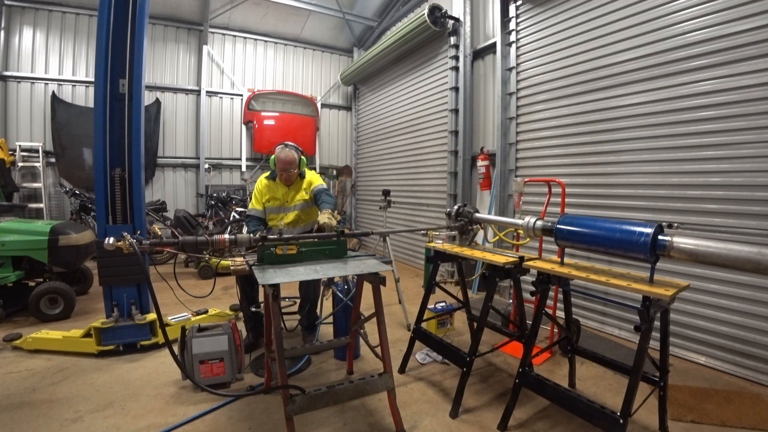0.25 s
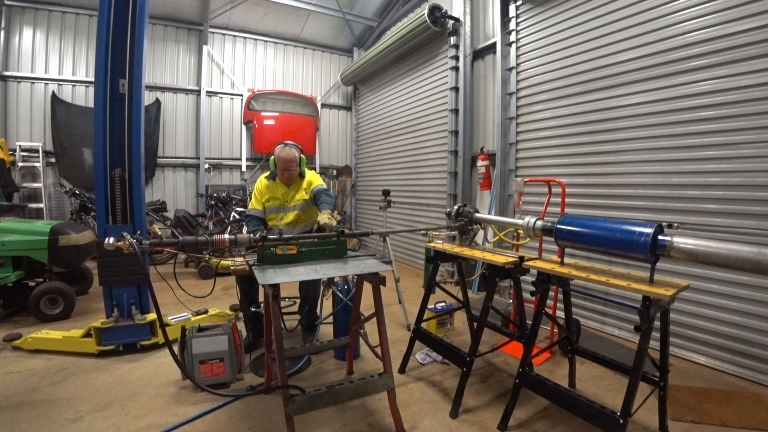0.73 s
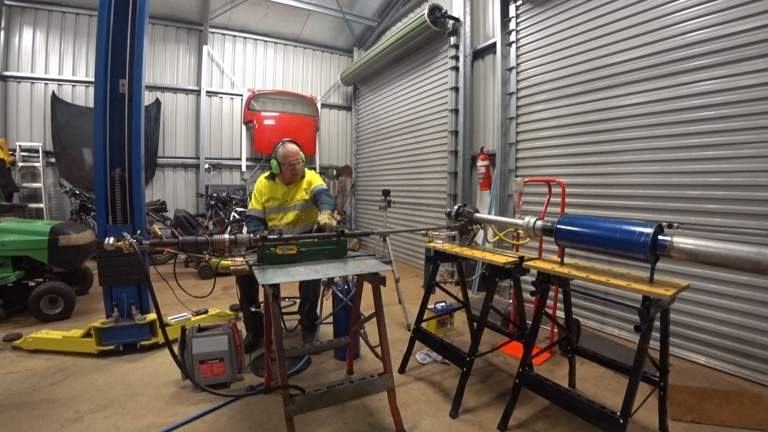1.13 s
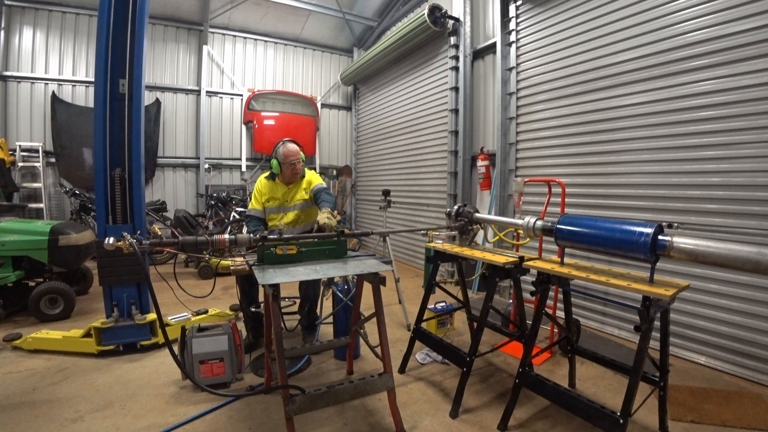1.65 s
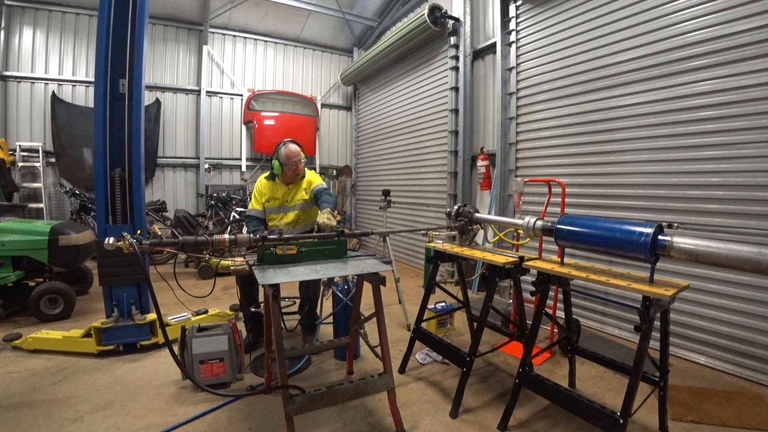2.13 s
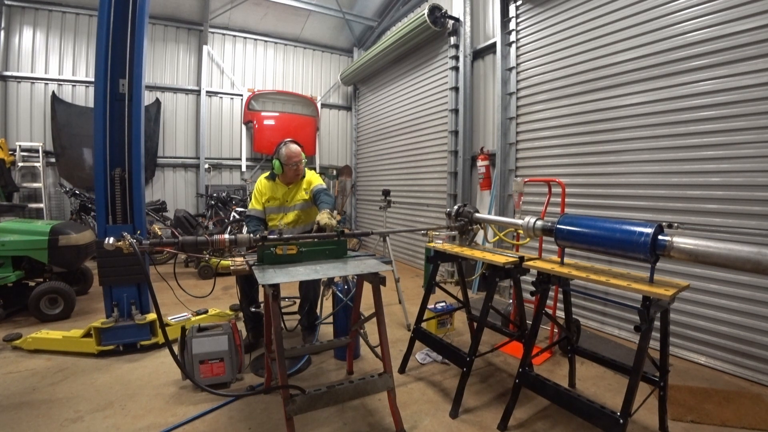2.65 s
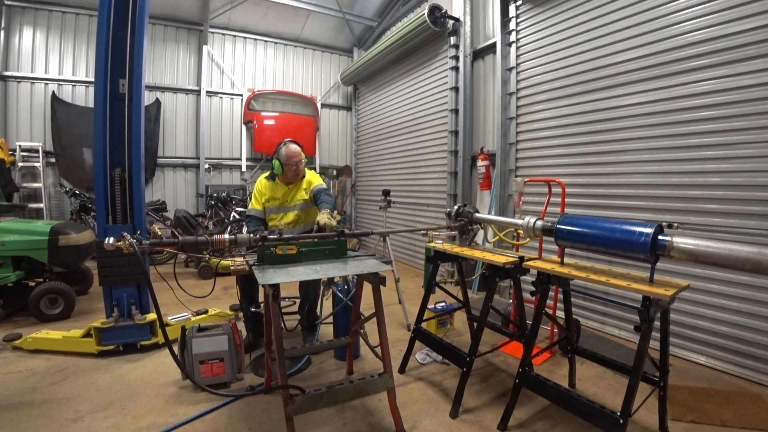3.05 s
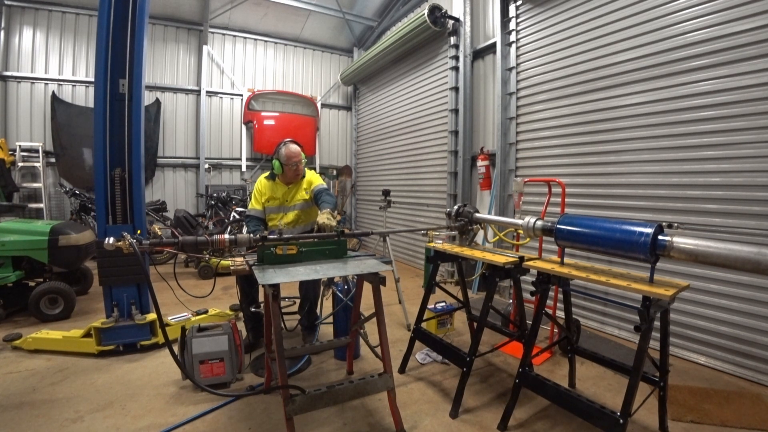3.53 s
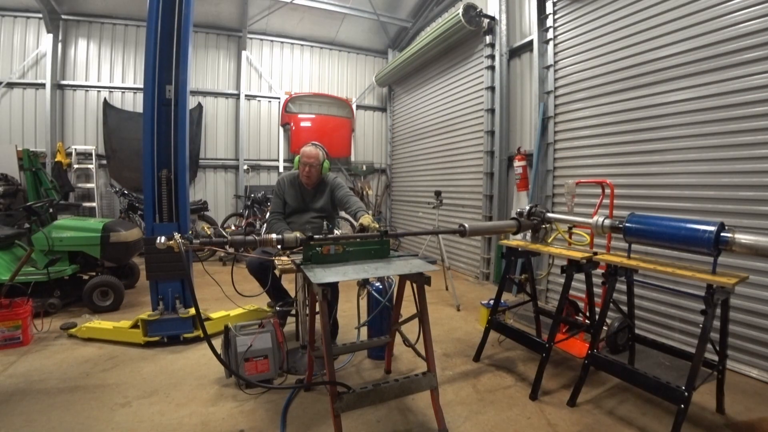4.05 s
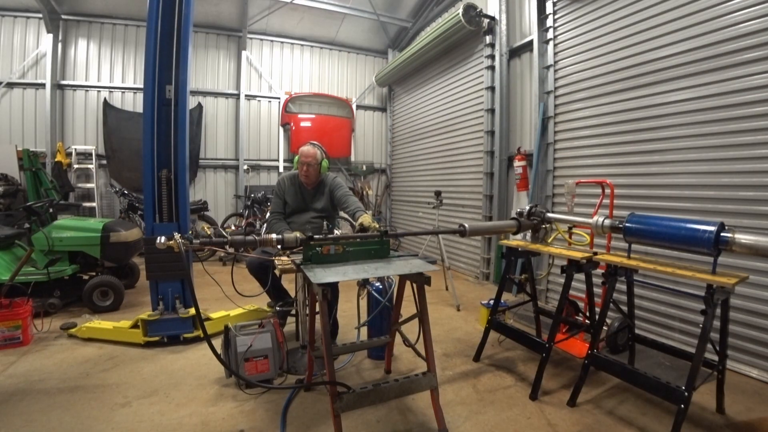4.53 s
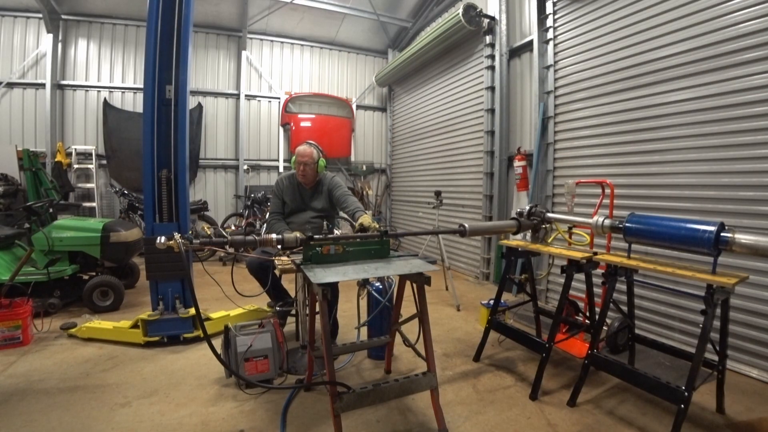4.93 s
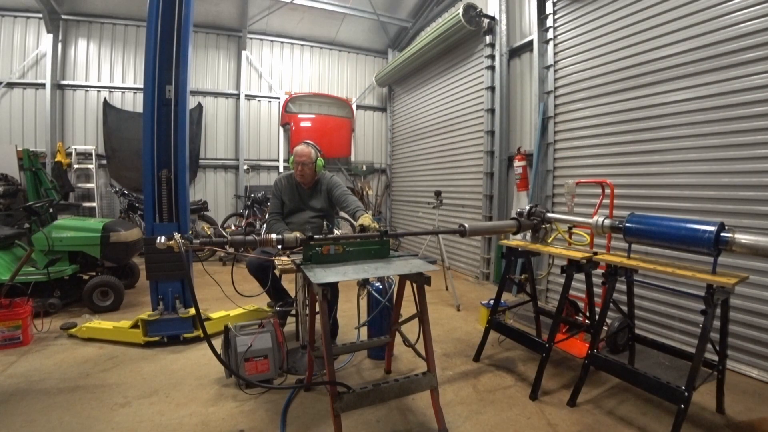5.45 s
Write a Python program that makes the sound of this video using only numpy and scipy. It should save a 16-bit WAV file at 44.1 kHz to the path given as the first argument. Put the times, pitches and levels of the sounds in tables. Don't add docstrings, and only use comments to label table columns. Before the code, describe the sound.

From 0 seconds a homemade detonation tube is firing inside a sheet-metal shed, about twenty pulses a second. The beat is regular underneath but ragged: some sparks give hard, bright cracks, others soft burns or barely a pop, and leftover gas adds late bangs between them. Each shot has a short noisy snap, a hollow midrange tube knock with quick echoes, and a dense clangy ring from the walls; the rings overlap into a harsh metallic roar. Around 0.35 to 0.4 seconds the ring briefly brightens. From about 3.1 seconds deep boom thins and the upper boom grows, sounding more nasal. At about 3.6 seconds firing and reverberation cut off instantly. Only a faint, steady compressed-gas hiss remains until about 5.5 seconds, coloured by thin whistling pipe resonances. The stereo pickup is loud and limited, light in deep bass, with thumps slightly to the right.

```python
import sys
import numpy as np
from scipy import signal
from scipy.fft import rfft, irfft, next_fast_len
from scipy.io import wavfile
from scipy.ndimage import uniform_filter1d

SR = 44100
rng = np.random.default_rng(int(sys.argv[2]) if len(sys.argv) > 2 else 0)


def attenuation_scalar(level_db):
    decades = np.asarray(level_db, float) / 20
    return 10 ** decades


def wav_record(signal):
    frames = np.transpose(np.atleast_2d(signal))
    bounded = np.clip(frames, -1, 1)
    quanta = np.round(bounded * 32767).astype(np.int16)
    wavfile.write(sys.argv[1], SR, quanta)


N = 251370


def shots():
    # (time [s], crack [dB], tube thump [dB], shed boom [dB])
    detonations = [(.0438, -17.5, -39, -17.5), (0.3421, -28, -25, -22), (0.4439, -23, -3.5, -22.5),
                   (0.6436, -15, -18, -18), (.7996, -22, -25, -23), (.9946, -20, -26, -18),
                   (1.1956, -16.5, -23, -17), (1.3949, -19, -19, -18.5), (1.4947, -18, -14, -17),
                   (1.6439, -17, -18, -16), (1.7963, -17.5, -16, -20.5), (1.8934, -19.5, -28, -28),
                   (1.947, -16, -12, -18.5), (2.0476, -21, -9.5, -16.5), (2.247, -14, -34, -17.5),
                   (2.5474, -20, -41, -18.5), (2.697, -21.5, -15, -21.5), (2.7476, -18.5, -32, -20.5),
                   (2.898, -18, -12, -18), (2.947, -20, -23, -26), (2.9968, -17.5, -26, -20.5),
                   (3.0968, -21, -29, -20), (3.197, -16, -4, -17), (3.2986, -22, -10, -17),
                   (3.3985, -20, -22, -18.5), (3.499, -20, -13, -21), (3.548, -16.5, -29, -21.5)]
    # (time [s], crack [dB], tube thump [dB], shed boom [dB])
    burns = [(0.0, -43, -18, -21.5), (.095, -36, -35, -18), (.1446, -25, -35, -25), (.1944, -25, -32, -24),
             (.2426, -33, -28, -31), (0.3959, -37, -15, -19), (.4954, -34, -13, -18.5),
             (0.5466, -24, -11, -23), (.5956, -25.5, -13.5, -28), (.7467, -23.5, -26, -25),
             (.8972, -25, -22, -26), (.944, -30, -19, -31), (1.046, -43, -30, -26.5),
             (1.097, -31, -16, -25), (1.2463, -43, -43, -19.5), (1.2953, -26, -16, -26),
             (1.4447, -45, -20, -22.5), (1.5465, -43, -38, -18.5), (1.6959, -31, -33, -19.5),
             (1.7478, -28, -16, -34), (1.8468, -46, -14, -24.5), (1.996, -39, -30, -26),
             (2.097, -38, -35, -19), (2.198, -29, -20, -26), (2.2964, -47, -19, -20.5),
             (2.3471, -42, -19, -21), (2.5975, -39, -43, -23.5), (2.7977, -41, -14, -20.5),
             (3.1503, -39, -35, -20), (3.3487, -43, -7.5, -24)]
    # (time [s], crack [dB], tube thump [dB], shed boom [dB])
    late_bangs = [(.16, -41, -7.5, -38), (.2105, -34, -6, -22), (.2736, -18.5, -21, -25),
                  (.7035, -38, -14, -21.5), (.8129, -47, -36, -29), (1.0628, -22, -16, -23),
                  (1.111, -40, -12, -24), (1.2612, -22, -14, -24), (1.56, -24, -4, -24),
                  (1.717, -23, -13, -32), (1.867, -20, -26, -24), (2.1135, -24, -11, -24.5),
                  (2.3141, -23, -20, -33), (2.363, -24, -18, -30), (2.417, -21.5, -14, -23.5),
                  (2.4633, -27, -10.5, -20), (2.6159, -23, -9, -27), (2.816, -22, -13, -27),
                  (3.0254, -27, -17, -23), (3.135, -25, -29, -21.5), (3.2274, -25, -20, -28),
                  (3.4374, -28, -16, -22), (3.5822, -20, -10, -30)]
    # (time [s], level [dB])
    richness = [(0, 0.), (.12, -1.), (.3, -3), (.34, 11), (.41, 11), (.47, 2.5), (.55, -5), (.8, 0),
                (1., 0), (1.65, -0.5), (1.95, 2), (2.2, -4.5), (2.45, -2), (2.75, 2.), (3., 0), (3.13, 6),
                (3.3, 3.), (3.55, 4.5)]
    spark_period_s, spark_count = 0.05006, 72
    sizzle_follows = 0.56
    misfire_db = (-34.5, -29.5, -33.5)

    sparks = 0.0446 + spark_period_s * np.arange(spark_count)
    lit = np.array(detonations + burns)[:, 0]
    misfires = [(s, *misfire_db) for s in sparks if abs(lit - s).min() > spark_period_s / 4]
    kinds = [(detonations, -7.5, -4), (burns, -9, -7.5), (late_bangs, -13, -8), (misfires, -10, -5)]
    rows = []
    for table, clang_db, sizzle_db in kinds:
        for row in table:
            rows.append((*row, row[3] + clang_db, row[3] + sizzle_db))
    rows = np.array(rows)
    rich_db = np.interp(rows[:, 0], *np.transpose(richness))
    return rows + np.outer(rich_db, [0, 0, 0, 0, 1, sizzle_follows])


def clicks(db, lag_s=0, sign=1):
    out = np.zeros(N)
    places = np.round((shots()[:, 0] + lag_s) * SR).astype(int)
    np.add.at(out, places, attenuation_scalar(db) * sign)
    return out


def rms_one(x):
    return x / np.sqrt(np.mean(x ** 2) + 1e-20)


def cracks(side_db=-23.0):
    # (centre [Hz], width [Hz], level [dB], time to fade 60 dB [s], delay [s])
    crack_bands = [
        (3040, 5800, -2.5, 0.015, 0.00075),
        (6100, 1850, -6, 0.028, 0.00016),
        (11620, 2300, -2.5, 0.071, 0.0011),
        (14150, 2500, 2.5, 0.014, 0.00077),
    ]
    out = 0
    for hz, width, db, t60, lag_s in crack_bands:
        band = signal.butter(2, [hz - width / 2, hz + width / 2], "band", fs=SR, output="sos")
        mid, side = rms_one(signal.sosfilt(band, rng.standard_normal((2, N))))
        struck = clicks(shots()[:, 1] + db, lag_s) ** 2
        energy = signal.lfilter([1], [1, -attenuation_scalar(-120 / (t60 * SR))], struck + 1e-18)
        out = out + np.sqrt(energy) * (mid + attenuation_scalar(side_db) * side * [[1], [-1]])
    return out


def thumps(scatter_db=2.5, burn_echo_db=-16.0):
    # (pitch [Hz], level under a shock [dB], level under a burn [dB], time to fade 60 dB [s])
    tube_tones = [(185, -39, -41, 0.082), (339, -13, -17.5, 0.063), (448, -16, -13, 0.081),
                  (540, -26, -22, 0.028), (668, -1.5, -8, 0.049), (794, -6, -19.5, 0.063),
                  (1148, -15, -13, 0.029), (2035, -29, -48, 0.018)]
    # (delay [s], level [dB])
    thump_echoes = [
        (.0013, -11),
        (.0205, -5),
        (.037, -5.5),
        (.046, -6),
    ]
    out = np.zeros(N)
    scatter = scatter_db * rng.standard_normal((len(shots()), len(tube_tones)))
    shock, burn = shots()[:, 1:3].T
    for (hz, shock_db, burn_db, t60), own in zip(tube_tones, scatter.T):
        struck = clicks(burn + burn_db + own, 0.00217)
        struck += clicks(burn + burn_db + burn_echo_db, 0.019)
        for lag_s, echo_db in thump_echoes:
            struck += clicks(shock + shock_db + echo_db + own, lag_s)
        r, w = attenuation_scalar(-60 / (t60 * SR)), 2 * np.pi * hz / SR
        out += signal.lfilter([0, np.sin(w)], [1, -2 * r * np.cos(w), r * r], struck + 1e-18)
    return out * attenuation_scalar(np.array([[-1.5], [1.5]]))


def at_hz(points, hz):
    table_hz, values = np.array(points).T
    return np.interp(np.log(hz + 1), np.log(table_hz), values)


def stereo_noise(size, spectrum, peaks, alike, lean, ripple_db, ripple_hz):
    hz = np.arange(size // 2 + 1) * SR / size
    lift_db = sum(db / (1 + (2 * (hz - centre) / width) ** 2) for centre, width, db in peaks)
    jagged = np.interp(hz / ripple_hz, np.arange(3000), rng.standard_normal(3000))
    lift_db += ripple_db * hz / (hz + 1500) * jagged
    mid, side = rfft(rng.standard_normal((2, size)))
    likeness = np.clip(at_hz(alike, hz), 0, 1)
    sides = np.array([[1], [-1]])
    pair = np.sqrt(1 + likeness) * mid + sides * np.sqrt(1 - likeness) * side
    return hz, pair * attenuation_scalar(at_hz(spectrum, hz) + lift_db + sides * at_hz(lean, hz) / 2)


def shed_answer(size, build_up_s, modes_db):
    # (frequency [Hz], level [dB per Hz])
    ring_colour = [(29, -62), (50, -12), (211, -14.5), (302, 4.5), (620, -2), (788, 6), (888, -14.5),
                   (1180, -11), (1820, -23.5), (2880, -13), (4530, -16.5), (6650, -11.5), (8870, -13),
                   (11500, -9.5), (15400, -17)]
    # (centre [Hz], width [Hz], lift [dB])
    panel_peaks = [(2640, 710, 8), (3273, 47, 6.5), (5660, 360, 4), (6590, 470, 3.5), (9970, 210, 6),
                   (11400, 1700, 2)]
    # (frequency [Hz], time to fade 60 dB [s])
    ring_fade = [(100, 0.42), (500, 0.43), (1500, 0.77), (4000, 1), (8000, 0.36), (14000, 0.39)]
    # (frequency [Hz], likeness [0 to 1])
    ring_alike = [(60, 0.9), (180, 1), (550, 0.96), (1650, 0.54), (4970, 0.75), (15000, 0.28)]
    # (frequency [Hz], left over right [dB])
    ring_lean = [(60, 3), (150, -3), (380, -4), (950, -3.0), (2380, 1), (5980, 2), (15000, -0.5)]
    # (pitch [Hz], level [dB], time to fade 60 dB [s])
    shed_modes = [(53.4, -4.5, 0.33), (116.4, -15.5, 0.55), (146, -33, 0.36), (176, -16, 0.35),
                  (271.5, -15, 1), (292, -7, 0.56), (311.8, -7, 0.64), (346.6, -20, 0.32), (388, -21, 0.68),
                  (419.8, 1, 0.31), (479, -14.5, 0.97), (504, -10, 0.99), (555, -2.5, 0.26),
                  (612.2, -2, 0.26), (662, -14, 0.22), (727, -8, 0.23), (768, -5, 0.59), (808.4, -4, 0.3),
                  (835, -6, 0.57), (986, -15, 0.16), (1014, -15, 0.21), (1105, -23.5, 0.15),
                  (1152, -12, 0.15), (1230, -16, 0.37), (1355, -17, 0.25), (1494, -21, 0.23)]

    hz, pair = stereo_noise(size, ring_colour, panel_peaks, ring_alike, ring_lean, ripple_db=3.0, ripple_hz=40.4)
    t, out = np.arange(size) / SR, 0
    half_octave = 2 * np.log2(hz / 40 + 1e-9)
    for k in range(19):
        band = irfft(pair * np.clip(1 - abs(half_octave - k), 0, 1), size)
        out = out + band * attenuation_scalar(-60 * t / at_hz(ring_fade, 40 * 2 ** (k / 2)))
    out = out / np.std(out[:, :SR // 20])
    phases = rng.uniform(0, 2 * np.pi, len(shed_modes))
    for (mode_hz, db, t60), phase in zip(shed_modes, phases):
        lean_db = at_hz(ring_lean, mode_hz) / 2 * np.array([[1], [-1]])
        level = attenuation_scalar(db + modes_db + lean_db - 60 * t / t60)
        out = out + level * np.sin(2 * np.pi * mode_hz * t + phase)
    early = 1 + .4 * np.exp(-t / .012)
    return out * early * np.sqrt(1 - np.exp(-t / build_up_s))


def shed_ring(variety=1.06):
    zones_hz = [837.5, 1090, 1440, 2350]
    size = next_fast_len(N + SR)
    hz = np.arange(size // 2 + 1) * SR / size
    answers = [rfft(shed_answer(1 << 15, build_up_s=0.0024, modes_db=-5.0), size) for _ in range(4)]
    blend = variety * rng.standard_normal(len(shots()))
    turn = np.arange(len(blend)) % 3
    shares = [np.cos(blend)] + [np.sin(blend) * (turn == j) for j in range(3)]
    out = 0
    for k in range(3):
        zone = np.sqrt(np.interp(np.log(hz + 1), np.log(zones_hz), np.array([0, 1, 1, 2]) == k))
        start = irfft(answers[0] * zone, size)[:, :SR // 20]
        level_db = shots()[:, 3 + k]
        for answer, share in zip(answers, shares):
            bangs = rfft(clicks(level_db, sign=share), size)
            out = out + answer * zone * bangs / np.std(start)
    return irfft(out, size)[:, :N]


def hiss():
    # (frequency [Hz], level [dB per Hz])
    hiss_colour = [(35, -80), (60, -46), (521, -10.5), (705, -9), (910, -4), (1630, -15.5), (1830, 1),
                   (2200, -10.5), (2710, -4), (3500, -9), (8090, -8.5), (8870, -7.5), (9970, -18.5),
                   (12300, -13), (15500, -27)]
    # (centre [Hz], width [Hz], lift [dB])
    pipe_peaks = [(895, 20, 11.5), (990, 24, 4), (1245, 180, 12), (1522.5, 39, 20), (1726, 330, 3.5),
                  (2797, 150, 8.5), (3090, 44, 9), (4280, 150, 7), (5090, 99, 6.5), (5965, 89, 11.5),
                  (6180, 67, 7), (7860, 81, -2), (8680, 86, 10.5), (9120, 60, 17.5), (11000, 360, 8.5),
                  (12660, 250, 6)]
    # (frequency [Hz], likeness [0 to 1])
    hiss_alike = [(60, 0.8), (180, 0.81), (550, 0.87), (1650, 0.68), (4970, 0.88), (15000, 0.65)]
    # (frequency [Hz], left over right [dB])
    hiss_lean = [(60, 0.0), (150, 0), (380, -2.0), (950, -3), (2380, 0.5), (5980, 0.7), (15000, -0.85)]
    size = next_fast_len(N)
    _, pair = stereo_noise(size, hiss_colour, pipe_peaks, hiss_alike, hiss_lean, ripple_db=4.5, ripple_hz=30.1)
    return attenuation_scalar(-34.5) * rms_one(irfft(pair, size)[:, :N])


def scene():
    change_s, change_fade_s = 3.609, 0.00089
    warm_s, deep_loss, upper_gain = 3.13, 0.55, 0.49
    gas_while_firing_db = 1
    t = np.arange(N) / SR
    gas = hiss()
    engine = shed_ring() + attenuation_scalar(2.) * thumps() + attenuation_scalar(1.5) * cracks()
    engine = signal.sosfilt(signal.butter(2, 174, "high", fs=SR, output="sos"), engine)
    deep = signal.sosfilt(signal.butter(1, [250, 375], "band", fs=SR, output="sos"), engine)
    upper = signal.sosfilt(signal.butter(1, [740, 880], "band", fs=SR, output="sos"), engine)
    engine = engine + (t > warm_s) * (upper_gain * upper - deep_loss * deep)
    firing = np.clip((change_s - t) / change_fade_s, 0, 1)
    return firing * (engine + attenuation_scalar(gas_while_firing_db) * gas) + (1 - firing) * gas


def limiter(x):
    limit_db, release_db_per_s, look_ahead_s = -6.5, 200, .003
    ramp = release_db_per_s * np.arange(N) / SR
    ahead = int(look_ahead_s * SR)
    over = np.maximum(20 * np.log10(abs(x).max(axis=0) + 1e-9) - limit_db, 0)
    over = np.append(over[ahead:], np.zeros(ahead))
    held = np.maximum.accumulate(over + ramp) - ramp
    return x * attenuation_scalar(-.6 * uniform_filter1d(held, ahead))


def low_pass(x):
    return signal.sosfilt(signal.butter(12, 16500, fs=SR, output="sos"), x)


def record(dry):
    heard = signal.sosfilt(signal.butter(2, 60, "high", fs=SR, output="sos"), dry)
    heard = limiter(heard)
    heard = signal.sosfilt(signal.ellip(12, .5, 55, 15740, fs=SR, output="sos"), heard)
    return low_pass(heard)


dry = scene()
out = record(dry)
wav_record(out)
```